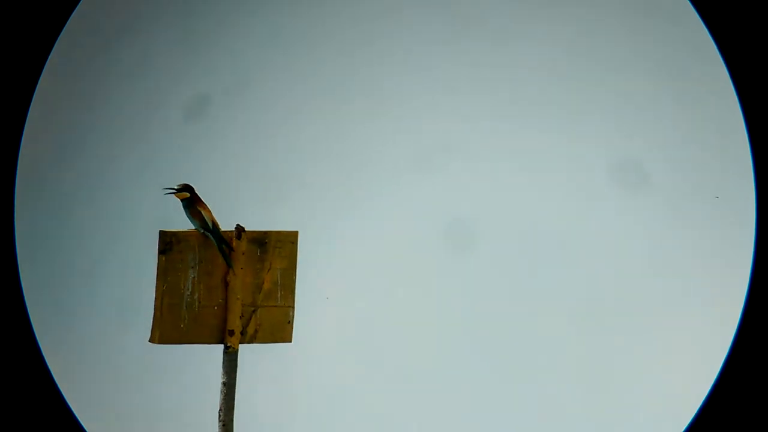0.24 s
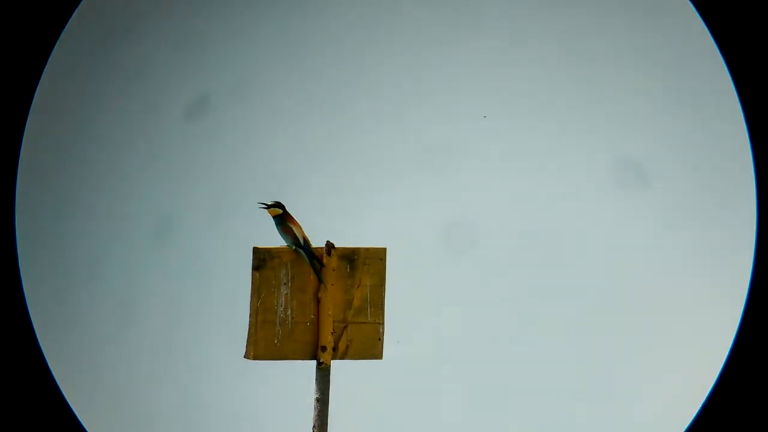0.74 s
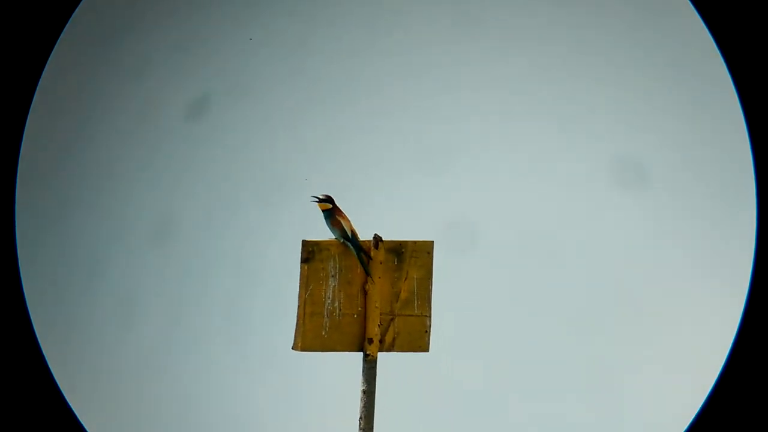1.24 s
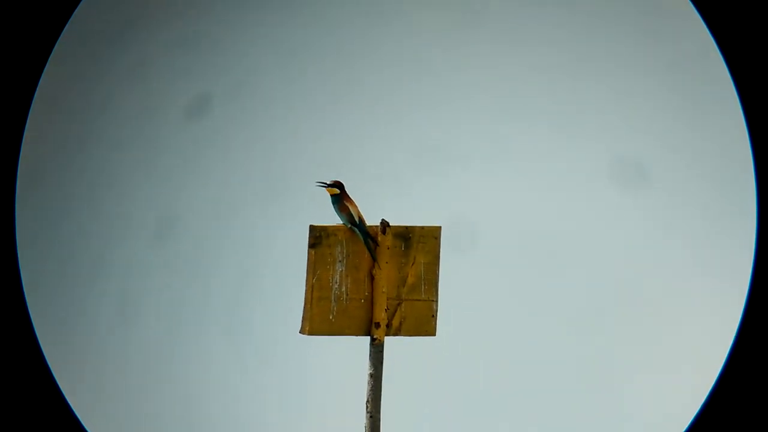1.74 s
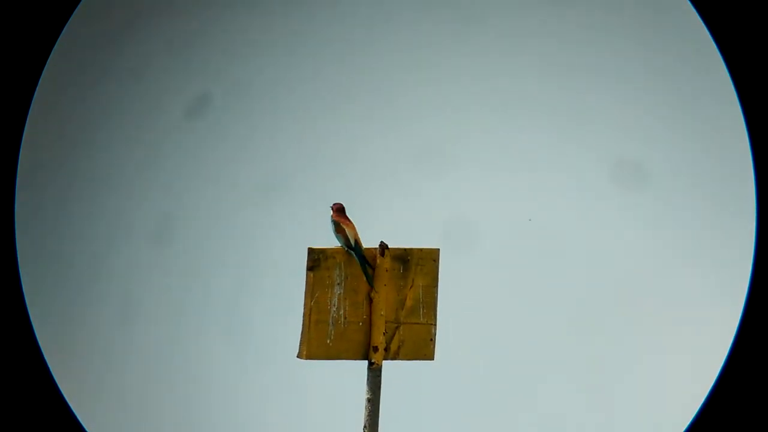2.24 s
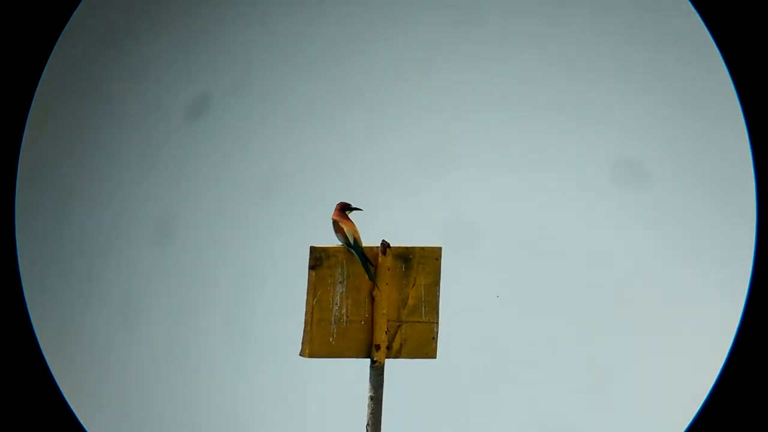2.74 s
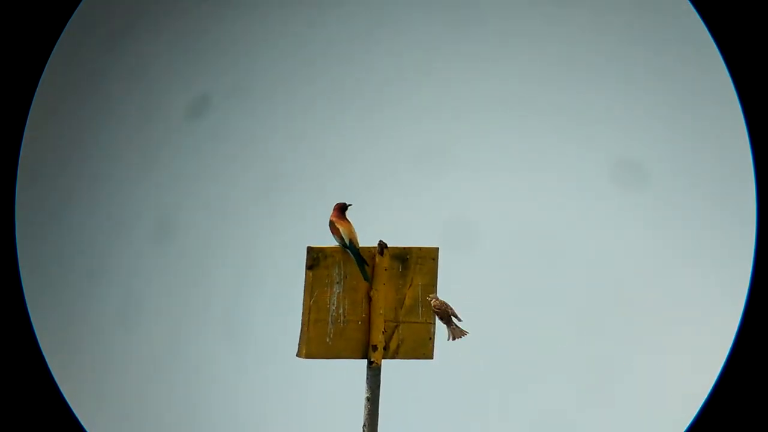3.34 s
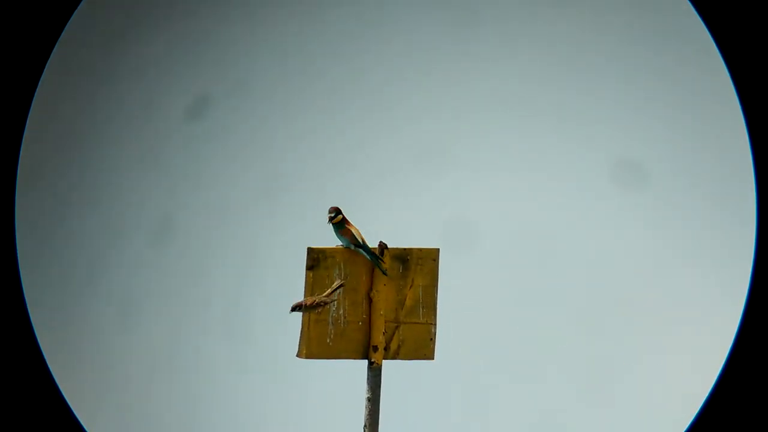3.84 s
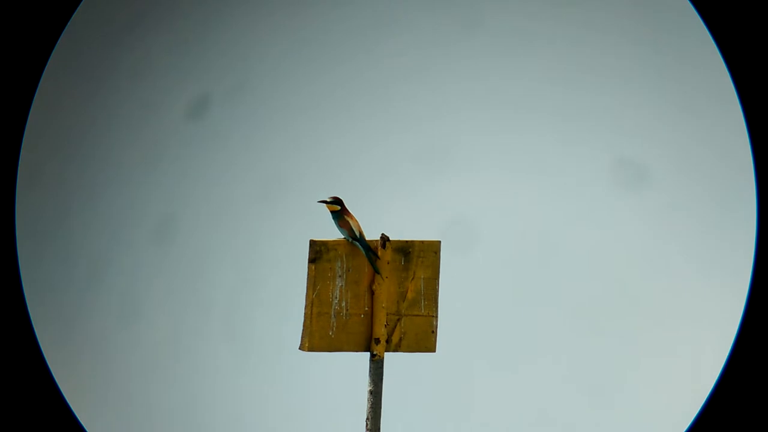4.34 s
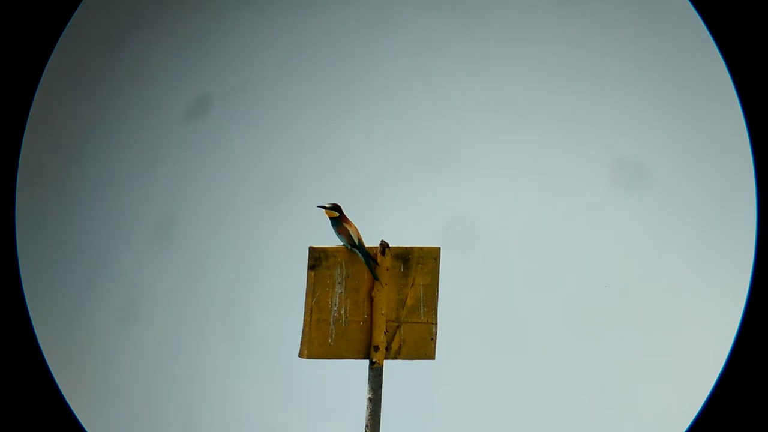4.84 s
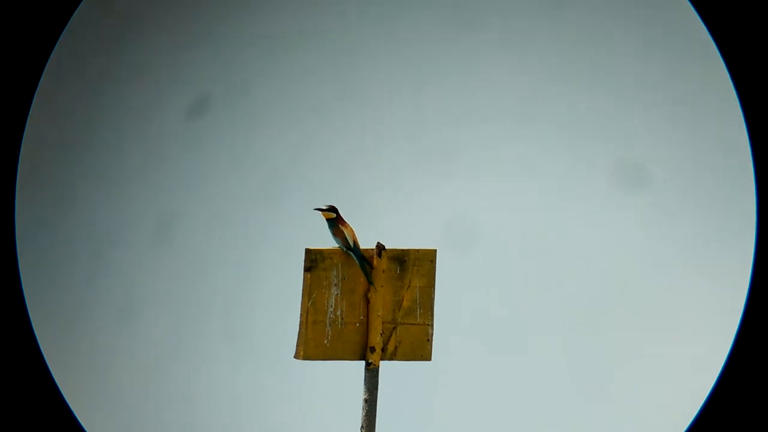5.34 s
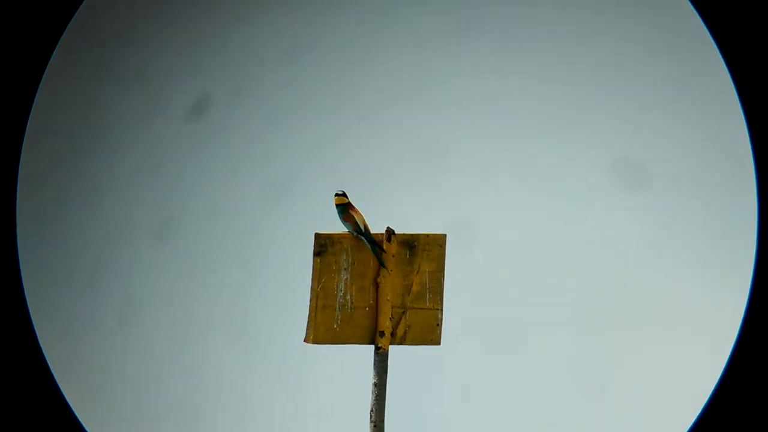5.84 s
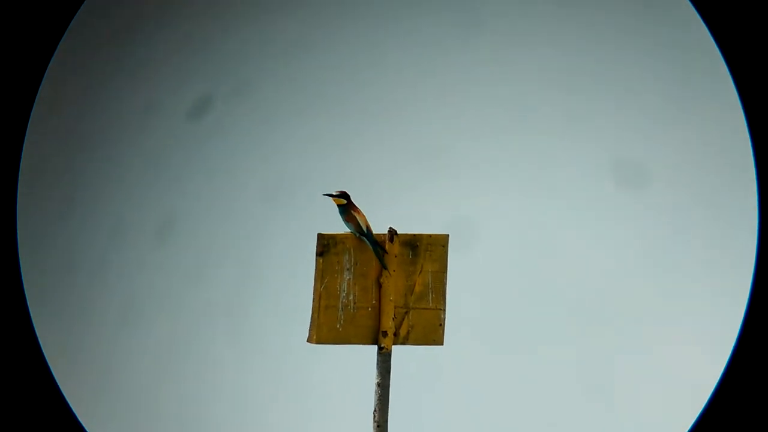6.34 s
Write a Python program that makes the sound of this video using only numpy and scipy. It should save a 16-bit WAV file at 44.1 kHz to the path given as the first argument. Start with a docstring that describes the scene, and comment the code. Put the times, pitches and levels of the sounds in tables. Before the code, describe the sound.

Bee-eaters give short rolling whistles over soft outdoor hiss and distant twittering, with finger rubs and a couple of sharp knocks on the camera.

```python
"""Over a soft hiss and the twitter of their colony, bee-eaters give short rolling whistles in open country.
A small songbird trills far behind them. Fingers knock and rub on the camera, close to its left
microphone opening, making the body thump and the shell tick. Three light gusts rumble on the openings,
and a far bird wheezes near the end. The recorder turns the background down in the pauses."""
import sys
import numpy as np
from scipy import signal
from scipy.fft import rfft, irfft, next_fast_len
from scipy.io import wavfile
from scipy.ndimage import uniform_filter1d

SR = 44100
rng = np.random.default_rng(int(sys.argv[2]) if len(sys.argv) > 2 else 0)


def pcm_store(signal):
    """Save signal as 16-bit PCM."""
    levels = np.round(np.clip(np.atleast_2d(signal), -1, 1) * 32767)
    wavfile.write(sys.argv[1], SR, levels.astype(np.int16).T)


N = 291114
TIME = np.arange(N) / SR

# The tone colours of five noises. Each row: frequency in Hz, strength there in dB.
HISS_COLOUR = [(60, -17.5), (120, -9.5), (300, -10), (600, -14), (1000, -15), (2100, -17.5), (4300, -22),
               (6000, -25.5), (9000, -24.5), (14200, -25), (15800, -31)]
DRONE_COLOUR = [(20, -9), (45, -1.5), (68, 0), (100, -5.5), (160, -12), (300, -18.5), (700, -32.5)]
RUMBLE_COLOUR = [(30, -7.5), (110, -4), (175, 8.5), (260, 3), (400, 1), (700, -9.5), (950, -17.5),
                 (1250, -41.5), (3000, -62)]
HIGH_HISS_COLOUR = [(800, -23), (1500, 1), (3000, 4.5), (4500, 0.5), (7000, -2.5), (8500, -16),
                    (11000, -12.5), (16000, -24)]
WIND_COLOUR = [(20, -8), (45, 1.5), (68, -2), (100, -6), (150, -19), (250, -23.5), (500, -44)]
# How loud the colony twitters. Each row: time in seconds, level in dB.
COLONY_LEVELS = [(0.0, -69), (0.18, -77), (0.99, -74.5), (1.14, -69), (1.58, -75.5), (1.99, -66),
                 (2.35, -84), (2.54, -76), (3.51, -75), (3.77, -78.5), (4.26, -74), (4.56, -77),
                 (5.37, -76.5), (5.88, -80), (6.16, -70.5), (6.6, -77)]
# Three call shapes, each a high arch, a flat part near 4 kHz and a dip.
# Each row: seconds into the call, pitch in Hz, level in dB.
ROLL = [(0, 4100, -13), (.005, 4650, -6), (.009, 5200, 0), (.020, 5450, -1), (.026, 4050, -6),
        (.032, 4250, -1), (.039, 4750, -7), (.047, 4050, -16), (.052, 4040, -4), (.064, 4200, -5),
        (.074, 3150, -18)]
SLUR = [(0, 3950, -11), (.006, 5100, -6), (.013, 5500, -4), (.023, 3950, -9), (.035, 4250, 1),
        (.052, 3980, -3), (.057, 3180, -15), (.064, 3330, -5), (.077, 4200, -13)]
SLIDE = [(0, 4300, -10), (.014, 5200, -3), (.021, 4450, -10), (.038, 4120, 0), (.046, 3950, -7),
         (.058, 3250, -15), (.074, 3850, -7), (.081, 4300, -6), (.087, 4300, -18)]
# Bee-eater calls. Each row: start in seconds, shape, level in dB, pitch factor, length factor.
BEE_EATER_CALLS = [(0.041, ROLL, -54, 0.97, 0.98), (0.401, SLIDE, -54, 1, 0.98),
                   (0.745, SLIDE, -57, 0.9905, 0.88), (.950, ROLL, -52, 0.98, 0.8329),
                   (1.246, ROLL, -50.5, 0.95, 0.94), (1.463, SLIDE, -53, 0.99, 1),
                   (1.855, SLUR, -50.5, 0.97, 0.97), (1.937, ROLL, -52, 1, 0.93),
                   (2.741, SLUR, -53.5, 0.97, 0.94), (2.832, ROLL, -56, 0.995, 1.0),
                   (3.308, ROLL, -58.5, 0.95, .95), (3.622, SLUR, -55, 0.97, 1.08),
                   (3.994, ROLL, -55.5, 1, 0.92), (4.706, ROLL, -54.5, 0.98, 0.9956),
                   (5.507, ROLL, -56, 0.98, 1.05)]
# The songbird's trills. Each row: start and length in seconds, first and last pitch in Hz,
# swings per second, level in dB.
TRILLS = [(.13, 0.14, 4190, 4130, 107, -72.5), (1.11, .08, 5680, 4320, 36, -67.5),
          (1.201, 0.073, 4800, 5630, 37, -62.5), (1.353, .05, 5720, 4920, 50, -75),
          (1.547, 0.18, 3960, 3800, 55, -72), (2.004, 0.17, 4530, 4400, 63, -69),
          (2.212, 0.23, 4350, 3810, 23, -69.5), (2.496, 0.028, 4800, 3681, 90, -64),
          (2.518, .04, 3000, 2862, 55, -64), (2.63, 0.16, 2830, 3880, 42, -71),
          (2.994, 0.15, 3050, 2490, 62, -70), (3.115, 0.045, 4461, 3520, 47, -66.5),
          (3.24, 0.097, 4770, 4700, 68, -68), (3.348, 0.18, 4400, 4470, 107, -66),
          (3.51, 0.039, 4880, 3500, 70, -72), (3.684, 0.39, 4250, 4070, 180, -75),
          (4.87, 0.079, 4810, 3660, 37, -73), (5.003, 0.17, 3380, 3400, 58, -73),
          (5.743, 0.38, 2580, 2760, 110, -74.5)]
# Soft fingertip taps. Each row: start in seconds, push in dB, contact time in seconds.
SOFT_TAPS = [(.4053, -27, 0.0021), (0.439, -38, 0.0027), (.542, -40.5, .0031), (0.8747, -29, 0.0044),
             (1.216, -36.5, 0.001956), (1.263, -37.5, 0.0024), (1.296, -32, 0.0021), (1.306, -36, .002),
             (1.4907, -28.5, 0.0042197), (1.619, -37.5, .0034), (4.0695, -36.5, 0.0045),
             (5.0507, -28, 0.003162), (5.3888, -33.5, 0.0034), (5.5281, -33, 0.0042),
             (5.938, -30.5, 0.004092), (6.0597, -21.5, 0.0031), (6.075, -22.5, 0.003)]
# Hard knocks. Each row: start in seconds, push in dB, contact time in seconds,
# bass cutoff in Hz, tick level in dB.
HARD_KNOCKS = [(1.7887, -27, 0.001961, 171, -20.5), (1.7991, -26.5, .0042, 80, -55),
               (1.8644, -14.5, .0017, 199, -26), (5.1218, -0.64, 0.00169, 334, -12.5),
               (5.1316, -40.5, .0013, 205.4, -17.5)]
# How the camera's body and hard shell ring. Each row: frequency in Hz, width in Hz, level in dB.
BODY_RINGS = [(166.9, 65, 2.5), (234.3, 28, -6), (380, 38.1, -0.5), (551, 78, -5.5)]
SHELL_RINGS = [(2262.5, 400, -4.5), (4457, 226, 12.5), (5420, 2540, 4), (10800, 2870, 0)]
# Rustles. Most are finger rubs; at 1.787 s a brief high hiss and rumble swell into the knock.
# Each row: peak, rise and fall times in seconds, rumble and high hiss levels in dB.
RUSTLES = [(.445, 0.043, 0.09, -60, -71.5), (1.299, 0.24, 0.19, -55, -76),
           (1.787, 0.035, 0.014, -45.5, -53), (1.81, .004, 0.3, -59.5, -68),
           (5.139, 0.0098, 0.031, -25.5, -45), (5.283, .074, 0.1607, -44.5, -63),
           (5.404, 0.013, 0.0692, -48.5, -69), (5.551, 0.05085, 0.11, -52, -73.5),
           (5.925, 0.085, 0.06748, -46.5, -57), (6.069, 0.067, 0.025, -45, -61.5)]
# Three gusts, one list for each. Each row: time in seconds, level in dB.
GUST_LEVELS = [
    [(2.7, -73), (2.77, -54.5), (3.36, -57), (3.532, -52), (3.564, -72), (3.642, -58), (3.8, -73)],
    [(3.95, -74), (3.978, -83.5), (3.994, -53.5), (4.144, -61), (4.202, -49.5), (4.254, -60.5), (4.45, -63)],
    [(5.25, -64), (5.27, -70), (5.298, -54.5), (5.52, -64), (5.534, -56.5), (5.636, -57), (5.8, -86)],
]
# The far wheeze. Each row: time in seconds, pitch in Hz, level in dB.
WHEEZE_SHAPE = [(5.97, 5090, -85), (6.08, 4980, -75.5), (6.17, 4980, -79), (6.24, 4925, -72),
                (6.42, 4910, -76.5), (6.5, 5150, -75.5), (6.6, 4910, -79)]


def from_db(db):
    """Turn decibels into a factor to multiply a sound by."""
    return 10 ** (np.asarray(db) / 20)


def rms_one(x):
    """Scale a sound so its average strength (rms) is 1."""
    return x / np.sqrt(np.mean(x ** 2) + 1e-20)


def in_time(rows, t=TIME):
    """Join a table's points with straight lines, giving one curve for each column after the time."""
    times, *columns = np.transpose(rows)
    return [np.interp(t, times, column) for column in columns]


def pan(left_db):
    """Left and right gains that make the left side louder by left_db."""
    return from_db([[left_db / 2], [-left_db / 2]])


def filtered(x, kind, hz, order=2):
    """Keep the "low" part, the "high" part or a "band" of a sound."""
    return signal.sosfilt(signal.butter(order, hz, kind, fs=SR, output="sos"), x + 1e-18)


def drift(rate_hz):
    """A smooth random wobble, about 1 in size."""
    return rms_one(filtered(rng.standard_normal(N + SR), "low", rate_hz)[SR:])


def noise(colour):
    """Noise of strength 1 with a given tone colour, falling away above the table's last row."""
    hz, level_db = np.transpose(colour)
    size = next_fast_len(N)
    f = np.maximum(np.fft.rfftfreq(size, 1 / SR), 1)
    gain = from_db(np.interp(np.log(f), np.log(hz), level_db))
    edges = f / (f + 10) / np.maximum(f / hz[-1], 1) ** 4
    return rms_one(irfft(rfft(rng.standard_normal(size)) * gain * edges, size)[:N])


def wide_noise(colour, shared):
    """Stereo noise, partly shared by the two sides."""
    common = noise(colour)
    return np.sqrt(shared) * common + np.sqrt(1 - shared) * np.array([noise(colour), noise(colour)])


def resonate(x, rings):
    """Let a sound set an object ringing at several frequencies at once."""
    out = 0
    for hz, width_hz, level_db in rings:
        r = np.exp(-np.pi * width_hz / SR)
        feed = np.array([1, 0, -1]) * (1 - r * r) / 2
        feedback = [1, -2 * r * np.cos(2 * np.pi * hz / SR), r * r]
        out = out + from_db(level_db) * signal.lfilter(feed, feedback, x + 1e-18)
    return out


def add(track, start_s, sound):
    """Mix a sound into a track."""
    at = max(round(start_s * SR), 0)
    track[..., at:at + sound.shape[-1]] += sound[..., :max(N - at, 0)]


def outdoors(x, early_db, early_s, tail_db, tail_s=.5):
    """Add quick echoes from nearby ground and walls, and a thin tail that drops 60 dB in tail_s."""
    t = np.arange(SR // 2) / SR
    early = rng.standard_normal((2, len(t))) * (rng.random((2, len(t))) < 900 / SR)
    early *= np.exp(-t / early_s) * (t > .001)
    tail = rng.standard_normal((2, len(t))) * from_db(-60 * t / tail_s) * (1 - np.exp(-t / early_s))
    paths = sum(from_db(db) * echoes / np.linalg.norm(echoes, axis=1, keepdims=True)
                for db, echoes in [(early_db, early), (tail_db, tail)])
    paths[:, 0] += 1  # the direct sound
    return signal.fftconvolve(x[None], paths, axes=1)[:, :N]


def background(hiss_db=-65.5, drone_db=-62):
    """A steady hiss and a faint low drone."""
    hiss = from_db(hiss_db) * wide_noise(HISS_COLOUR, shared=.033) * pan(-1.3)
    drone = from_db(drone_db) * wide_noise(DRONE_COLOUR, shared=.39) * pan(3)
    return hiss + drone


def colony(count=4, centre_hz=4600, spread=.23, syllable_db=6, gain_db=1):
    """Very distant birds slide about in pitch, heard almost wholly through their echoes."""
    level_db, = in_time(COLONY_LEVELS)
    voices = np.zeros(N)
    for _ in range(count):
        syllables = from_db(syllable_db * np.tanh(drift(31.416)))
        hz = centre_hz * np.exp(spread * drift(50))
        voices += syllables * np.sin(2 * np.pi * np.cumsum(hz) / SR)
    blended = outdoors(voices, early_db=15, early_s=.035, tail_db=10)
    return from_db(level_db + gain_db) * rms_one(blended) * pan(-1.6)


def bee_eaters(waver=.013, jitter=.028, flutter_db=2.5, hoarse_db=-17, edge_s=.00045, overtone_db=-32):
    """Each call is a whistle that wavers around its shape, with a fast rasp in pitch and strength."""
    out = np.zeros((2, N))
    unsteady = 1 + waver * drift(60) + jitter * drift(800)
    rasp = from_db(flutter_db * drift(210)) * (1 + from_db(hoarse_db) * drift(2250))
    for start, shape, level_db, pitch, stretch in BEE_EATER_CALLS:
        t = np.arange(int(shape[-1][0] * stretch * SR)) / SR
        hz, shape_db = in_time(shape, t / stretch)
        hz = uniform_filter1d(hz, size=130) * pitch * np.interp(start + t, TIME, unsteady)
        phase = 2 * np.pi * np.cumsum(hz) / SR
        tone = np.sin(phase) + from_db(overtone_db) * np.sin(2 * phase)
        swell = from_db(level_db + shape_db) * np.clip(np.minimum(t, t[-1] - t) / edge_s, 0, 1)
        whistle = swell * np.interp(start + t, TIME, rasp) * tone
        add(out, start, outdoors(whistle, early_db=-2.5, early_s=.013, tail_db=-12, tail_s=.35))
    return out * pan(-3.1)


def far_songbird(swing_hz_per_s=11000, pulse_db=1.5, jitter=.01, distance_db=-3, shimmer_db=3.5):
    """Gliding trills, loudest at the top of each swing, fade in and out through moving air."""
    song = np.zeros(N)
    unsteady = 1 + jitter * drift(300)
    for start, length, first_hz, last_hz, rate, level_db in TRILLS:
        t = np.arange(int(length * SR)) / SR
        swing = np.sin(2 * np.pi * rate * t)
        glide_hz = first_hz + (last_hz - first_hz) * t / length
        depth_hz = swing_hz_per_s / rate  # slow trills swing wide, fast ones only a little
        hz = (glide_hz + depth_hz * swing) * np.interp(start + t, TIME, unsteady)
        swell = from_db(level_db + pulse_db * swing) * signal.windows.tukey(len(t), .15)
        add(song, start, swell * np.sin(2 * np.pi * np.cumsum(hz) / SR))
    carried = song * from_db(distance_db + shimmer_db * drift(45))
    return outdoors(carried, early_db=-4, early_s=.01, tail_db=-10) * pan(-3)


def knocks(body_db=2, shell_db=1, tap_tick_db=-30, tick_s=.000063, grit_db=-20, grit_s=.0011):
    """A finger thumps the body, duller the longer it touches; the shell ticks and grates briefly."""
    thumps, ticks = np.zeros((2, N))
    t = np.arange(SR // 15) / SR
    taps = [(start, db, contact_s, 1 / contact_s, db + tap_tick_db) for start, db, contact_s in SOFT_TAPS]
    for start, push_db, contact_s, cutoff_hz, tick_db in HARD_KNOCKS + taps:
        push = from_db(push_db) * np.sin(np.pi * np.minimum(t / contact_s, 1)) ** 2
        add(thumps, start, filtered(push, "high", cutoff_hz))
        grit = from_db(grit_db) * rng.standard_normal(len(t)) * np.exp(-t / grit_s)
        add(ticks, start, from_db(tick_db) * (np.exp(-t / tick_s) + grit))
    thumps = filtered(thumps, "high", hz=70, order=1)  # slow pressure changes leak out of the opening
    ticks = filtered(ticks, "band", hz=[1900, 11500])  # the thin shell gives off only treble
    body = thumps + resonate(thumps, BODY_RINGS)
    return from_db(body_db) * body + from_db(shell_db) * resonate(ticks, SHELL_RINGS)


def rustles(grain_db=3, fade_db=20, ring_db=-8):
    """A low rumble and a high hiss with a ring near 4.5 kHz swell and fade unevenly together."""
    rumble, hiss = noise(RUMBLE_COLOUR), noise(HIGH_HISS_COLOUR)
    hiss += from_db(ring_db) * rms_one(resonate(rng.standard_normal(N), SHELL_RINGS[1:2]))
    out = np.zeros(N)
    for peak_s, rise_s, fall_s, rumble_db, hiss_db in RUSTLES:
        span = slice(max(int((peak_s - 10 * rise_s) * SR), 0), int((peak_s + 10 * fall_s) * SR))
        from_peak = np.maximum((peak_s - TIME[span]) / rise_s, (TIME[span] - peak_s) / fall_s)
        rustle = from_db(rumble_db) * rumble[span] + from_db(hiss_db) * hiss[span]
        out[span] += from_db(-fade_db * from_peak) * rustle
    return out * from_db(grain_db * drift(120))


def wind(gain_db=.1, buffet_db=2):
    """Gusts beat on the microphone openings, each opening getting mostly its own rumble."""
    gusts = sum(from_db(in_time(gust)[0]) * (TIME > gust[0][0]) * (TIME < gust[-1][0])
                for gust in GUST_LEVELS)
    buffeting = from_db(gain_db + buffet_db * drift(34))
    return gusts * buffeting * wide_noise(WIND_COLOUR, shared=.077) * pan(-.65)


def wheeze(spread=.044503, shake_hz=260, overtone_db=-5, gain_db=2):
    """A long note shakes in pitch so fast that it rasps; its overtone grows with the bird's effort."""
    hz, effort_db = in_time(WHEEZE_SHAPE)
    phase = 2 * np.pi * np.cumsum(hz * (1 + spread * drift(shake_hz))) / SR
    overtone = from_db(overtone_db + effort_db - effort_db.max()) * np.sin(2 * phase)
    swell = from_db(gain_db + effort_db) * (TIME > WHEEZE_SHAPE[0][0])
    return outdoors(swell * (np.sin(phase) + overtone), early_db=3.5, early_s=.013, tail_db=-15)


def smooth(x, seconds):
    """Follow a changing value with a lag."""
    r = np.exp(-1 / (seconds * SR))
    return signal.lfilter([1 - r], [1, -r], x)


def noise_suppressor(x, threshold_db=-60.5, opening_db=6, shut_db=-3.5, hold_s=.11, closing_s=.36):
    """The recorder opens up for each louder sound, holds briefly, then lowers the level in the pause."""
    power = np.mean(filtered(x, "high", hz=55) ** 2, axis=0)
    level_db = 10 * np.log10(smooth(power, seconds=.027) + 1e-12)
    # 0 is shut and 1 is open; anything above 1 takes time to sink away, which makes the hold
    opened = np.clip((level_db - threshold_db) / opening_db, 0, 1 + hold_s / closing_s)
    sinking = TIME / closing_s
    held = np.minimum(np.maximum.accumulate(opened + sinking) - sinking, 1)
    return x * from_db(shut_db * (1 - smooth(held, seconds=.0063)))


def scene(right_side_db=-41):
    """Birds and air reach both sides; knocks and rustles are heard almost only on the left."""
    birds = colony() + bee_eaters() + far_songbird() + wheeze()
    close_sounds = (knocks() + rustles()) * from_db([[0], [right_side_db]])
    return background() + birds + close_sounds + wind()


def record(dry):
    """The recorder turns the pauses down and steeply cuts the highest treble."""
    cutoff_hz = 15800
    treble_cut = signal.ellip(10, .1, 70, cutoff_hz, fs=SR, output="sos")
    return signal.sosfilt(treble_cut, noise_suppressor(dry))


dry = scene()
out = record(dry)
pcm_store(out)
```